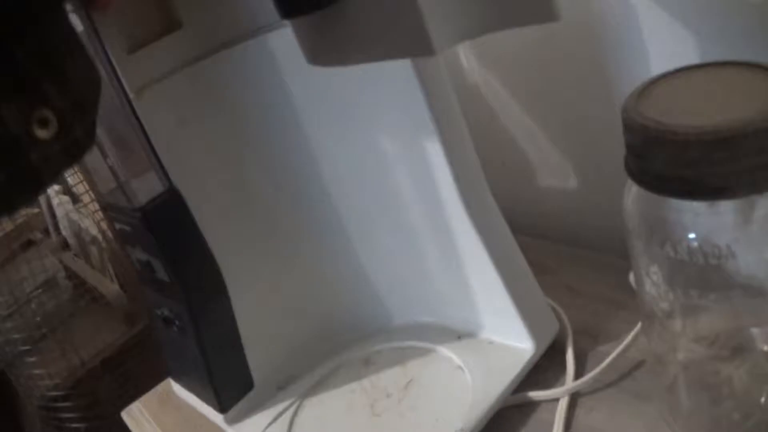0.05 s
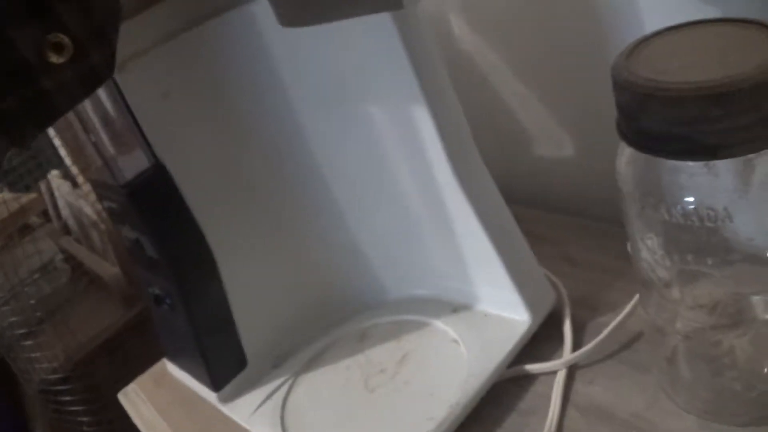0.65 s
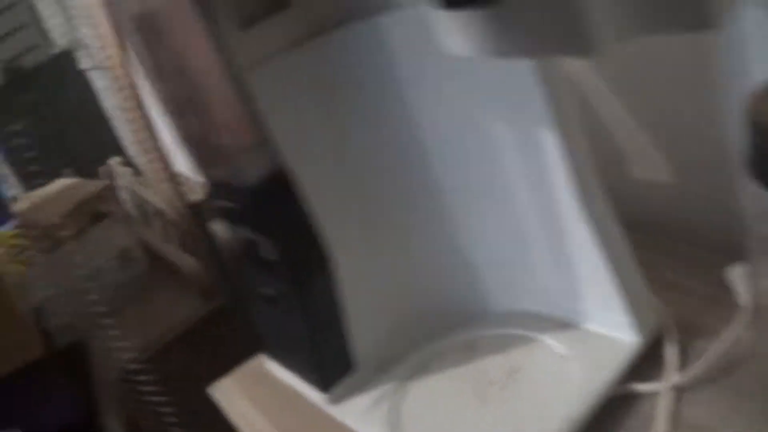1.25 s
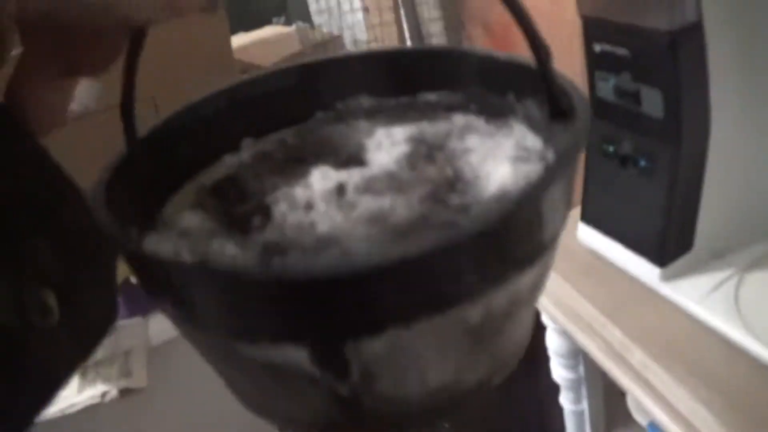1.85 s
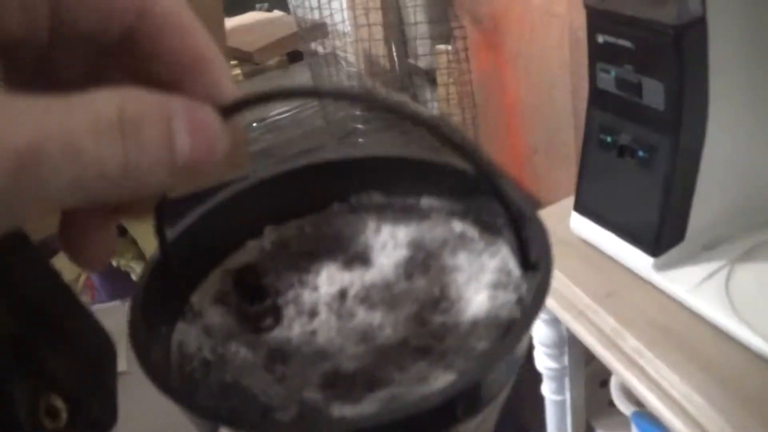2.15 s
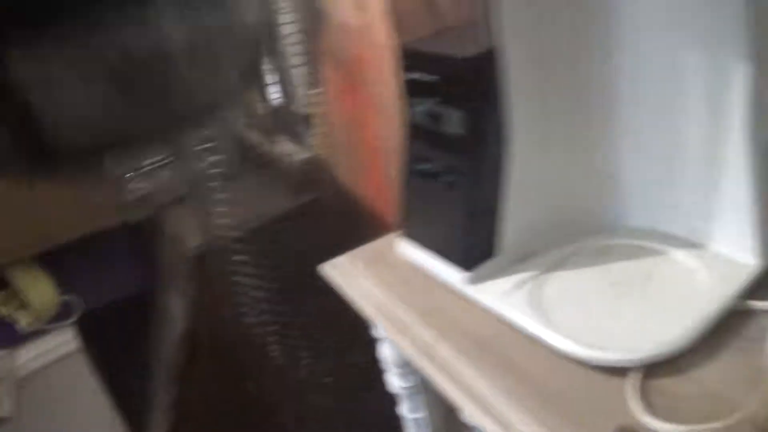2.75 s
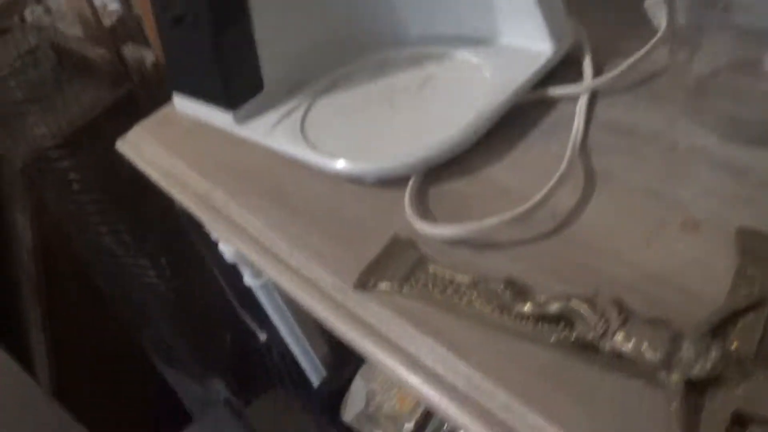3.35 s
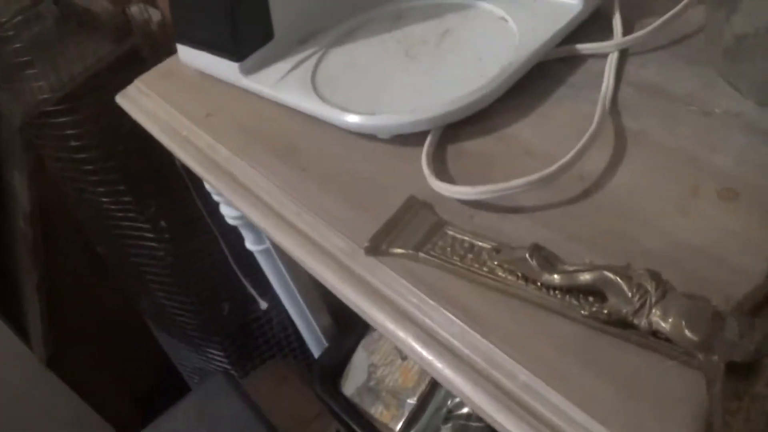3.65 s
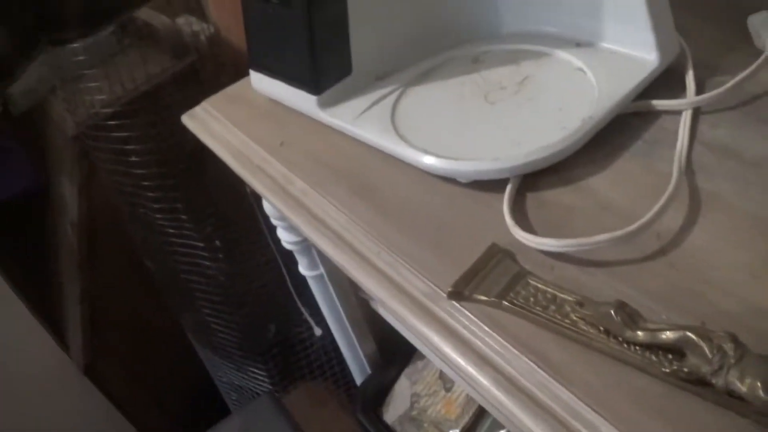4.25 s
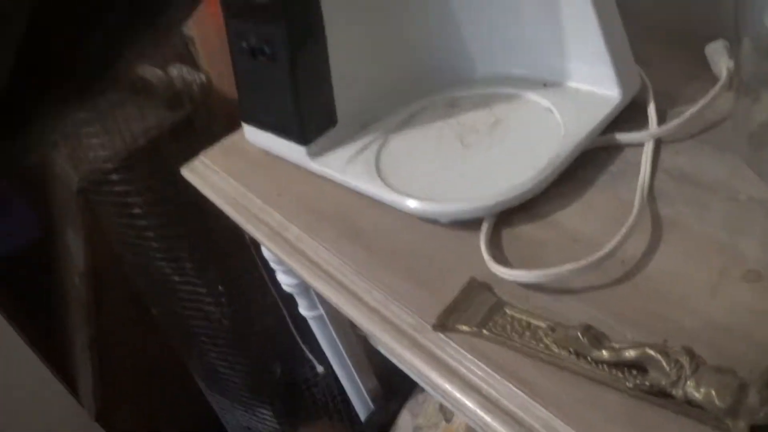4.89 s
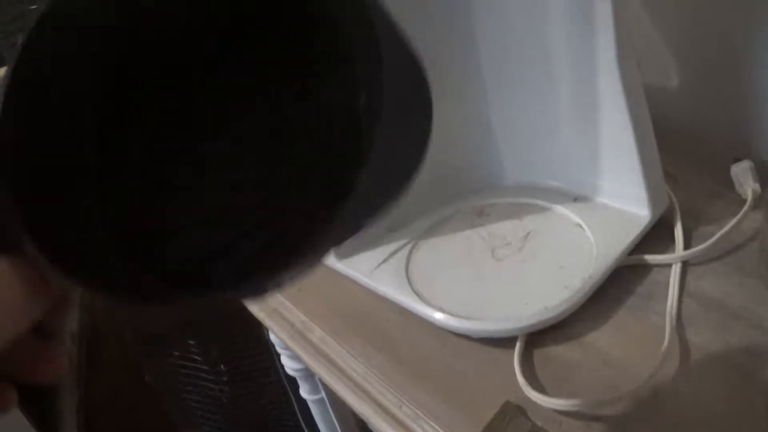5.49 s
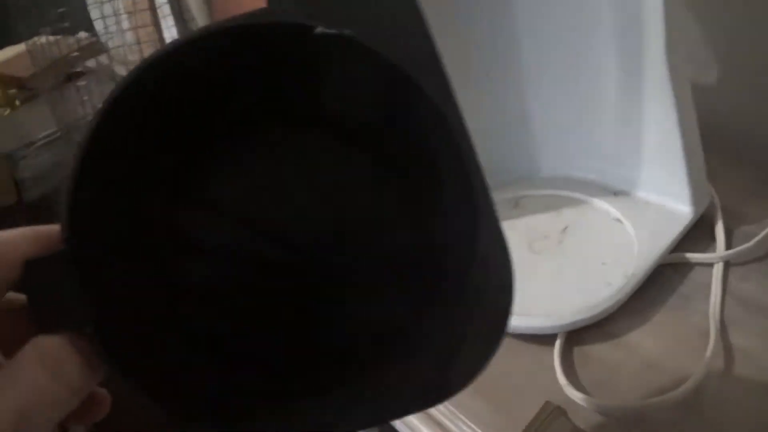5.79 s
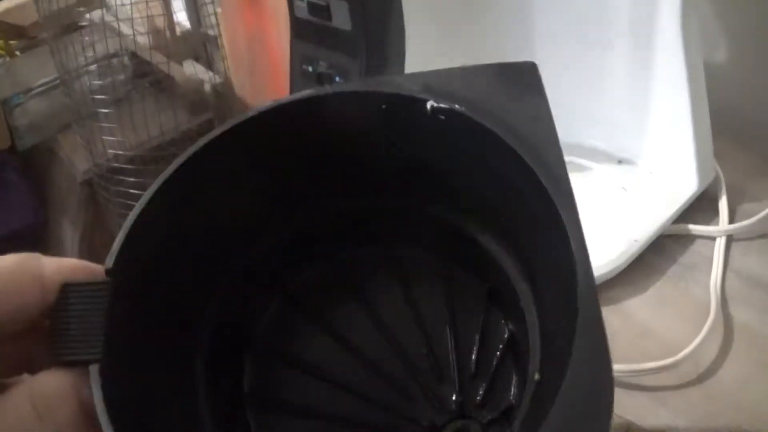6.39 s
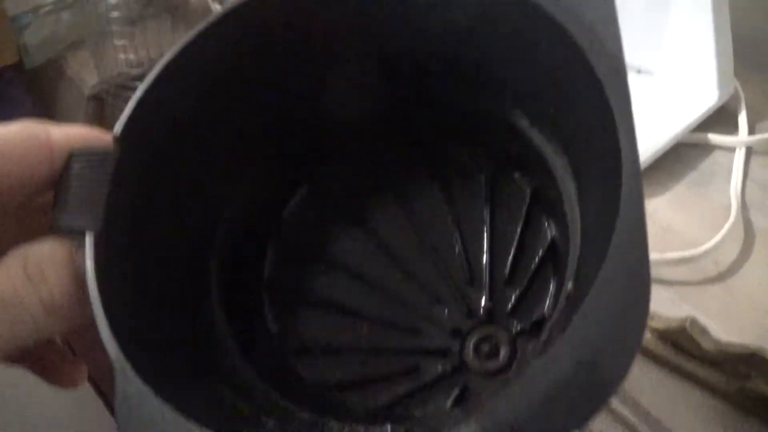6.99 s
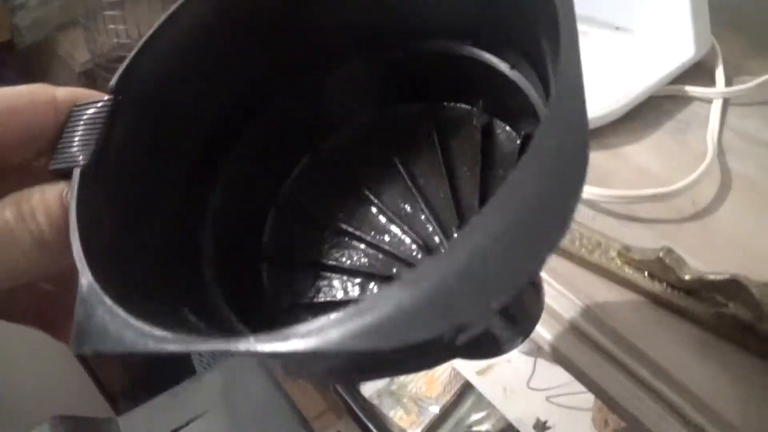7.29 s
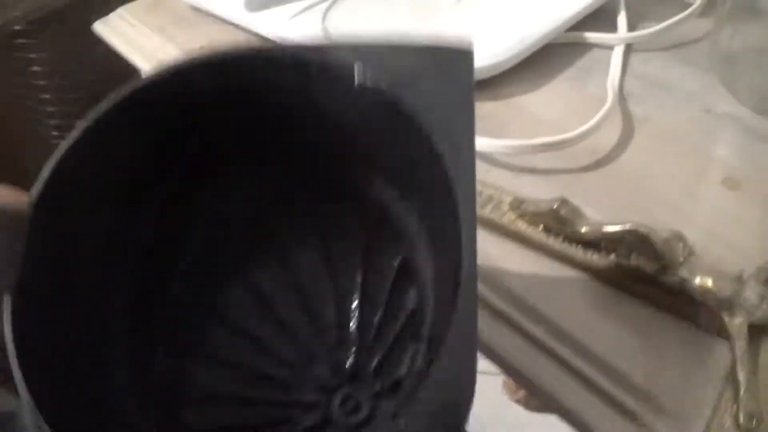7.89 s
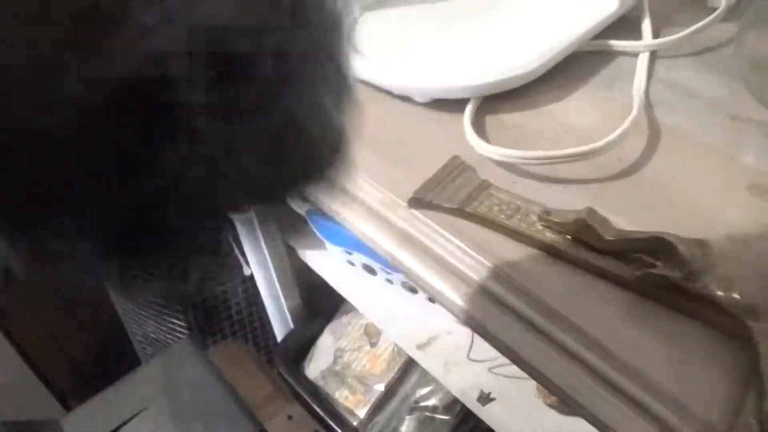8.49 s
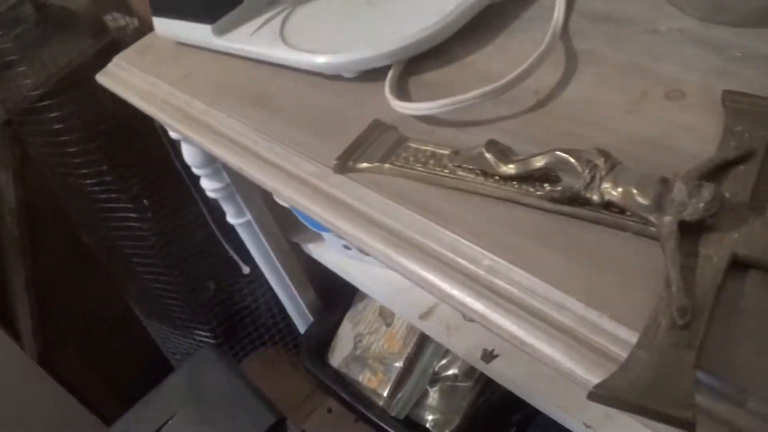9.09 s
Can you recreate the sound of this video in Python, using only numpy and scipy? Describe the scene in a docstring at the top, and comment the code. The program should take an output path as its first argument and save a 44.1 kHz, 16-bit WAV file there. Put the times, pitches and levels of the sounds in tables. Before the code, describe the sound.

Close up in a small quiet room with soft air noise and a faint hum, a coffee maker is taken apart by hand. A filter clicks and rubs on its way out, then bounces and rattles briefly on a table. A plastic basket knocks and chatters against the housing as it comes loose. Several seconds of very light handling pass before it is set down with a sharp double knock.

```python
"""Plastic parts of a drip coffee maker, taken apart on a wooden side table in a small quiet room.
The mesh filter is lifted out and dropped, then the basket is tugged free and set down.
Each knock is a clack, a panel tone and the ring of the part; rims rub, parts chatter, fingers tick.
Underneath: room air, mains hum, a sleeve, the hollow of parts held near, a faint lens motor."""
import sys
import numpy as np
from scipy import signal
from scipy.fft import rfft, irfft, next_fast_len
from scipy.io import wavfile

SR = 44100
rng = np.random.default_rng(int(sys.argv[2]) if len(sys.argv) > 2 else 0)


def generate_wav(sig):
    """Save sig (samples, or channels by samples) to the path in sys.argv[1] as 16-bit PCM at SR."""
    pcm = np.round(np.clip(np.atleast_2d(sig).T, -1, 1) * 32767).astype(np.int16)
    wavfile.write(sys.argv[1], SR, pcm)


N = 407484
TIME = np.arange(N) / SR


def from_db(db):
    return 10 ** (np.asarray(db) / 20)


def rms_one(x):
    return x / np.sqrt(np.mean(x ** 2, axis=-1, keepdims=True) + 1e-20)


def at_hz(rows, hz):
    """Table columns interpolated over log frequency."""
    knots_hz, *columns = np.transpose(rows)
    return [np.interp(np.log(np.maximum(hz, 1)), np.log(knots_hz), c) for c in columns]


def add(track, start_s, sound):
    at = max(int(start_s * SR), 0)
    track[at:at + len(sound)] += sound[:N - at]


def fade(t, t60_s):
    return np.exp(-np.log(1000) * t / np.maximum(t60_s, 1e-3))


def swell(t, hz, rise_s):
    """Onset: contact time plus half a cycle, so low modes start slower."""
    return 1 - np.exp(-(t / (rise_s + 0.5 / hz)) ** 2)


def struck_mode(t, hz, t60_s, rise_s):
    return np.sin(2 * np.pi * hz * t) * fade(t, t60_s) * swell(t, hz, rise_s)


def stroke(peak_s, db, rise_s, fall_s):
    """Two-sided Gaussian envelope of one hand movement."""
    away = (TIME - peak_s) / np.where(TIME < peak_s, rise_s, fall_s)
    return from_db(db) * np.exp(-np.minimum(away ** 2, 50))


def wander(per_s, count):
    """Independent random controls, per_s new values a second."""
    knots = rng.standard_normal((count, 4096))
    return np.array([np.interp(TIME * per_s, np.arange(len(k)), k) for k in knots])


def half_octaves():
    """Yields centre_hz and band-pass per band."""
    edges_hz = np.geomspace(70, 16500, 17)
    for lo, hi in zip(edges_hz, edges_hz[1:]):
        yield np.sqrt(lo * hi), signal.butter(2, [lo, hi], "band", fs=SR, output="sos")


def coloured(x, colour):
    """Filter by rows of freq_hz, gain_db."""
    size = next_fast_len(N)
    gain_db, = at_hz(colour, np.fft.rfftfreq(size, 1 / SR))
    return irfft(rfft(x, size) * from_db(gain_db), size)[..., :N]


def resonate(x, colour):
    """Chain of peaks and dips."""
    for hz, width_hz, db in colour:
        cosine_term = -2 * np.cos(2 * np.pi * hz / SR)
        half_width, gain = np.pi * width_hz / SR, from_db(db / 2)
        b = [1 + half_width * gain, cosine_term, 1 - half_width * gain]
        a = [1 + half_width / gain, cosine_term, 1 - half_width / gain]
        x = signal.lfilter(b, a, x + 1e-18)
    return x


def narrow_noise(hz, width_hz):
    """Noise in one resonance; rms 1."""
    sos = signal.butter(2, width_hz, fs=SR, output="sos")
    slow = signal.sosfilt(sos, rng.standard_normal((2, N)))
    phase = 2 * np.pi * hz * TIME
    return rms_one(slow[0] * np.cos(phase) + slow[1] * np.sin(phase))


def tiny_impacts(colour, per_s, floor=0.29):
    """Random impulses over a noise floor; rms 1."""
    impulses = rng.standard_normal(N) * (floor + (rng.random(N) < per_s / SR))
    return rms_one(coloured(impulses, colour))


def clacks(starts_s, levels_db, tilts_db, humps_db, lengths, rise_s):
    """Contacts shake dense, damped plastic modes; the treble dies first."""
    # plastic modes: freq_hz, gain_db, t60_s
    plastic = [(90, -24, 0.069), (131, -26, 0.14), (196, -4.5, 0.1), (301, -7.5, 0.19), (450, -8, 0.1),
               (804, -5.5, 0.075), (1130, 1, 0.019), (1700, -8.5, 0.044), (2300, -6, 0.055),
               (3170, -5.5, 0.033), (4660, -4.5, 0.03), (7100, 2.5, 0.027), (10000, -3, 0.027),
               (14100, -49.5, 0.023)]
    t = np.arange(SR // 6) / SR
    bursts, out = 0, np.zeros(N)
    for hz, band in half_octaves():
        gain_db, t60_s = at_hz(plastic, hz)
        shape = fade(t, t60_s * np.maximum(lengths, .2)[:, None]) * swell(t, hz, rise_s)
        burst = rms_one(signal.sosfilt(band, shape * rng.standard_normal(shape.shape) + 1e-18))
        octaves = np.log2(np.clip(hz, 280, 7000) / 1400)  # tilt and hump pivot at 1400 Hz
        band_db = levels_db + tilts_db * octaves - humps_db * octaves ** 2 + gain_db
        band_rms = from_db(band_db) * np.sqrt(np.mean(shape ** 2, axis=1))
        bursts = bursts + burst * band_rms[:, None]
    for start_s, burst in zip(starts_s, bursts):
        add(out, start_s, burst)
    return out


def knocks(contacts, modes, colour, clack_db, rise_s, panel_t60_cycles, spread_db, max_t60_s=.36):
    """Per contact: clack, short tone of the struck panel, longer ring of the whole part."""
    starts_s, levels_db, tilts_db, humps_db, _, _, rings_db = np.transpose(contacts)
    # bright, strong contacts end sooner; freely ringing parts clack longer
    lengths = 0.74 * 2 ** (-0.057 * tilts_db - 0.016 * levels_db + 0.019 * rings_db)
    out = resonate(clacks(starts_s, levels_db + clack_db, tilts_db, humps_db, lengths, rise_s), colour)
    t = np.arange(SR // 2) / SR
    hz, mode_db, t60_s = np.transpose(modes)
    rings = struck_mode(t, hz[:, None], np.minimum(t60_s, max_t60_s)[:, None], rise_s)
    for start_s, level_db, _, _, panel_hz, panel_db, ring_db in contacts:
        strengths = from_db(mode_db + spread_db * rng.standard_normal(len(hz)))
        strengths *= rng.choice([-1, 1], len(hz))
        panel = from_db(panel_db) * struck_mode(t, panel_hz, panel_t60_cycles / panel_hz, rise_s)
        ringing = from_db(ring_db) * (strengths @ rings)
        add(out, start_s, from_db(level_db) * (panel + ringing))
    return out


def air_and_hum(air_db=-53 + 0.54):
    """Steady air, alike at both ports in the bass and less so in the hiss, plus mains hum."""
    # air spectrum: freq_hz, density_db
    air_colour = [(15, -17), (25, -10.5), (64, -8.5), (87, -11.5), (114, -7), (165, -12.5), (240, -9.5),
                  (309, -11), (405, -11), (540, -8), (690, -6), (1250, -14.5), (1800, -23.5), (3160, -29.5),
                  (4490, -31.5), (9840, -34.5), (16000, -39)]
    # unshared part: freq_hz, gain_db
    side_colour = [(30, -47), (160, -22), (400, -21), (900, -12.5), (2200, -1.5), (5000, -5), (10000, -11),
                   (16000, -59)]
    # mains lines: freq_hz, rms_db
    hum_lines = [(59.8, -70), (119.8, -59.5)]
    mid, side = rms_one(coloured(rng.standard_normal((2, N)), air_colour))
    hum = sum(np.sqrt(2) * from_db(db) * np.sin(2 * np.pi * (hz * TIME + rng.random()))
              for hz, db in hum_lines)
    return from_db(air_db) * (mid + coloured(side, side_colour) * [[1], [-1]]) + hum


def running(runs, t, ramp_s=.06):
    """Motor level: ramp up, hold, ramp down."""
    return sum(from_db(db) * np.clip(.5 + np.minimum(t - start_s, end_s - t) / ramp_s, 0, 1)
               for start_s, end_s, db in runs)


def lens_motor(steps_per_s=29.8, idle_db=-63, spread_db=3.0):
    """Even steps ping one resonance, harder during focus hunts; the drive whirs faintly."""
    # focus hunts: start_s, end_s, level_db
    hunts = [(0, 1.2, -56), (2.1, 2.9, -56), (2.9, 3.5, -53), (4.9, 5.3, -55), (7.7, 8.3, -55.5),
             (8.55, 9.24, -52.5)]
    # drive runs: start_s, end_s, level_db
    whirs = [(1.3, 2.3, -81), (3.95, 4.2, -76), (5, 5.85, -77), (7.4, 7.7, -77)]
    out = np.zeros(N)
    ping = struck_mode(np.arange(SR // 30) / SR, hz=3270, t60_s=.016, rise_s=0.0002)
    for start_s in np.arange(0, TIME[-1], 1 / steps_per_s):
        level = max(running(hunts, start_s), from_db(idle_db))
        add(out, start_s, ping * level * from_db(spread_db * rng.standard_normal()))
    return out + running(whirs, TIME) * narrow_noise(hz=4050, width_hz=99)


def filter_lift():
    """The mesh filter knocks on its way out."""
    # knocks: start_s, level_db, tilt_db_per_oct, hump_db_per_oct2, panel_hz, panel_rel_db, ring_rel_db
    contacts = [(0.068, -34, -4.5, 1.5, 380, -3, -25), (0.091, -28.5, -1, 14, 785, -5, -9.5),
                (0.112, -38, -3, 7, 326, 4, -4), (0.276, -18.5, 4.5, 2.05, 1224, -2, -32),
                (0.3695, -29.5, 4.5, 5, 893, -2, -23), (0.4765, -27.5, 4.5, 6.5, 1190, -22, -40),
                (0.804, -34, -3, 9, 1640, 6, -28), (0.821, -36.0, 3.5, 2, 1700, 9, -32),
                (0.854, -27.5, -4.5, 1.5, 477, 5, -5.5), (0.878, -47, 0, 0.5, 325, 17, -12),
                (0.8915, -18, 2.5, 2.8, 1010, 1, -29), (0.895, -17.5, -2, 1.5, 723, 6, -35),
                (0.941, -24, 0.7, 0.63, 1196, 10.5, -23)]
    # filter modes while lifted: freq_hz, gain_db, t60_s
    filter_modes = [(216, 2, 0.088), (238, -10, .2), (335, -4.5, 0.19), (387, -1.5, 0.14), (511, -8, 0.16),
                    (730, -12, .17), (948, -7, .15), (1270, -20, .13), (1710, -3, 0.081),
                    (2550, -17, 0.087)]
    # clack resonances and dips: centre_hz, width_hz, gain_db
    clack_colour = [(150, 100, -5.5), (372, 100, 3), (1210, 83, 5.5), (1666, 110, 7.5), (2170, 400, -9.5),
                    (2660, 300, -0.5), (3210, 220, 2.5), (4270, 880, -4.5), (6260, 620, 3.5),
                    (10000, 1200, 3), (13900, 4800, -7)]
    return knocks(contacts, filter_modes, clack_colour,
                  clack_db=-0.5, rise_s=0.00072, panel_t60_cycles=24, spread_db=-1.5)


def rim_slides(fall_ratio=0.69):
    """Plastic rims rub in tiny slips; each slide builds, then catches."""
    # slides: peak_s, level_db, rise_s
    slides = [(.1, -52.5, 0.043), (.185, -59.5, 0.033), (0.584, -50.5, 0.014), (0.618, -48, 0.0082),
              (.84, -61.5, 0.13), (4.33, -59.5, 0.12), (4.6, -49.5, 0.063), (4.662, -37, 0.016),
              (4.785, -52.5, 0.044)]
    # friction spectrum: freq_hz, density_db
    slip_colour = [(300, -17), (900, 16.5), (1700, 7), (2400, 6), (3300, 7.5), (4800, 4), (7000, 6),
                   (10000, 5), (12500, -11), (16000, -14)]
    level = sum(stroke(peak_s, db, rise_s, rise_s * fall_ratio) for peak_s, db, rise_s in slides)
    return level * tiny_impacts(slip_colour, per_s=2500)


def finger_ticks():
    """Plastic ticks under the fingers, too light to ring a part."""
    # ticks: start_s, level_db, tilt_db_per_oct
    touches = [(0.5184, -53.5, 6), (0.7792, -46, 4), (1.3884, -56, 7), (1.609, -49.5, 3.5), (2.516, -44, 0),
               (3.318, -43.5, -5.5), (3.8766, -47.5, 4.5), (5.221, -44, 3.3), (5.7153, -45.5, 3),
               (5.7754, -47, 4), (5.8107, -39, -1), (7.221, -47.5, 4.2), (7.923, -36.5, .4),
               (7.9636, -41.5, -4)]
    starts_s, levels_db, tilts_db = np.transpose(touches)
    lengths = np.full(len(touches), 0.63)
    return clacks(starts_s, levels_db, tilts_db, humps_db=4.0, lengths=lengths, rise_s=0.00017)


def sleeve(folds_per_s=45, catch_db=4.0, fall_ratio=1.2):
    """Cloth scratches on cloth and catches on folds; the arm starts briskly, slows gently."""
    # arm movements: peak_s, level_db, rise_s
    arm_moves = [(1.55, -65, 0.17), (3.12, -67.5, 0.31), (4, -67.5, 0.35), (4.55, -70, 0.048),
                 (5.03, -64, 0.43), (7.52, -76, .13), (8.83, -68, 0.23)]
    # cloth spectrum: freq_hz, density_db
    cloth_colour = [(500, -11), (3000, 0.5), (6000, -8), (9000, -1.5), (10800, -6.5), (13000, -19),
                    (16000, -30)]
    level = sum(stroke(peak_s, db, rise_s, rise_s * fall_ratio) for peak_s, db, rise_s in arm_moves)
    folds, = wander(folds_per_s, count=1)
    return level * from_db(catch_db * folds) * tiny_impacts(cloth_colour, per_s=900, floor=0.25)


def hollow(sharpness=5.6):
    """Room noise rings in a part's cavity, louder as it nears the microphone."""
    # close passes: nearest_s, level_db, approach_s, cavity_hz
    passes = [(2.1, -53, 0.63, 810), (7.05, -54, 0.72, 708), (8.25, -58.5, 0.6, 700)]
    return sum(stroke(nearest_s, db, approach_s, approach_s) * narrow_noise(hz, hz / sharpness)
               for nearest_s, db, approach_s, hz in passes)


def filter_drop():
    """The filter bounces on the table, ringing and chattering."""
    # bounces: start_s, level_db, tilt_db_per_oct, hump_db_per_oct2, panel_hz, panel_rel_db, ring_rel_db
    contacts = [(3.5072, -12.5, 0.2, 2.8, 1850, -17, -18), (3.5135, -27, -3, 0.2, 243, -11, -8),
                (3.5315, -20, -1.7, 2.8, 530, -5, -19), (3.5565, -14.5, -3, 4.3, 640, -6.5, -22),
                (3.614, -31.5, -7, 3.7, 610, -20, -30), (3.629, -39, -3.5, 1.6, 756, 15, -7),
                (3.6955, -53.5, 1.6, 0.5, 253, 12, -12), (3.706, -39.5, -12, 5.8, 710, 8, -23),
                (3.756, -47.5, -3, 2.9, 282, -11, -16), (3.7828, -25.5, 3, 1.9, 767, 1, -41)]
    # filter modes: freq_hz, gain_db, t60_s
    filter_modes = [(90.6, -16.5, .4), (124, -7.5, 0.42), (205.3, -2.5, .4), (250.5, 5.5, 0.21),
                    (287, 4, 0.12), (570, 2, 0.21), (612, 1, 0.28), (770, -0.5, .22), (922, -8, 0.36),
                    (1145, 2, 0.33), (1410, 1.5, 0.16), (1590, -2, 0.25), (1710, -9, 0.19),
                    (1844, -4, 0.24), (1970, -22, 0.17), (2080, -11, 0.34), (3120, -11, 0.15),
                    (3370, -2, 0.077)]
    # clack resonances and dips: centre_hz, width_hz, gain_db
    clack_colour = [(380, 47, 3), (960, 310, -10), (1750, 500, 5.5), (2330, 440, -2), (3330, 460, 3.5),
                    (4700, 3400, -0.5)]
    blows = knocks(contacts, filter_modes, clack_colour,
                   clack_db=2.0, rise_s=0.00033, panel_t60_cycles=43, spread_db=1.0)
    return blows + chatter(contacts, gain_db=-25.5, t60_s=0.29)


def chatter(contacts, gain_db, t60_s):
    """A knocked part buzzes against its support: a dying shower of tiny touches per blow."""
    # buzz spectrum: freq_hz, density_db
    buzz_colour = [(400, -28), (1000, 3), (1450, 0), (2300, -7.5), (3500, -8), (5000, -15.5), (8000, -17.5),
                   (15000, -40)]
    t, envelope = np.arange(SR // 3) / SR, np.zeros(N)
    for start_s, level_db, *_ in contacts:
        add(envelope, start_s, from_db(level_db) * fade(t, t60_s) * swell(t, hz=200, rise_s=0.003))
    return from_db(gain_db) * envelope * tiny_impacts(buzz_colour, per_s=300)


def basket_tug():
    """The basket knocks and chatters against the housing as it comes free."""
    # knocks: start_s, level_db, tilt_db_per_oct, hump_db_per_oct2, panel_hz, panel_rel_db, ring_rel_db
    contacts = [(4.265, -28.5, -1.5, 1.15, 604, 4, -28), (4.302, -28, -7.5, 3.7, 534, 3.5, -50),
                (4.567, -41.5, -12, 1.9, 427, 13, -21), (4.5845, -28.1, 4.5, 0.34, 1120, 18.5, -10),
                (4.595, -15.5, -3.5, 2.3, 1680, 6, -15.5), (4.6025, -14, -1.3, 1.7, 307, -8, -13.5),
                (4.643, -26, -1.5, 1.3, 280, -6, -27), (4.6617, -17, 4, 2.6, 840, 6.5, -36),
                (4.674, -25.5, -3.5, 2.4, 555, 4, -32), (4.768, -16.9, 0.5, 3.8, 372, -6.5, -16),
                (4.794, -21, -3, 2.6, 370, 3, -31), (4.8625, -17, 4.8, 7.7, 327, -7, -11)]
    # housing modes: freq_hz, gain_db, t60_s
    housing_modes = [(244, -5, 0.17), (328, 1, 0.19), (404, -7.5, 0.18), (549, 1, 0.081), (613, -11, 0.13),
                     (1020, -11, 0.13), (1596, -1, 0.085), (1823, 8.5, 0.038), (1750, -30, 0.11),
                     (3410, -5.5, 0.096)]
    # clack and chatter resonances and dips: centre_hz, width_hz, gain_db
    tug_colour = [(154, 73, -6), (685, 710, -4), (1080, 120, 5), (1350, 240, -5.5), (1700, 290, 7),
                  (2460, 1150, -3.5), (3300, 600, 6), (4300, 600, -1.5), (5150, 700, 2), (10100, 2200, 0)]
    blows = knocks(contacts, housing_modes, tug_colour,
                   clack_db=-2.5, rise_s=0.000056, panel_t60_cycles=15.3, spread_db=3.5)
    return blows + resonate(chatter(contacts, gain_db=-20.5, t60_s=0.089), tug_colour)


def basket_set_down():
    """The basket lands on the table with two hard knocks and chatters."""
    # knocks: start_s, level_db, tilt_db_per_oct, hump_db_per_oct2, panel_hz, panel_rel_db, ring_rel_db
    contacts = [(9.1133, -15, -0.5, 2, 1005, 9, -9.5), (9.1538, -15, -1, 1.73, 1200, -0.5, -10.5),
                (9.159, -31, -4.5, 1.7, 940, -8, -12), (9.173, -42.5, -14.5, 3.6, 280, 16, -23)]
    # basket modes: freq_hz, gain_db, t60_s
    basket_modes = [(257, -8, .2), (311.4, -5.5, 0.31), (935, 0, 0.14), (960, -5, 0.18), (1076, 6, 0.056),
                    (1860, -3, 0.057)]
    # clack resonances and dips: centre_hz, width_hz, gain_db
    clack_colour = [(148, 180, -15.5), (275, 90, 8.5), (980, 240, -15), (1620, 140, -12), (2300, 970, -4),
                    (5230, 870, -8.5), (13900, 4300, -20)]
    blows = knocks(contacts, basket_modes, clack_colour,
                   clack_db=3.5, rise_s=0.0002, panel_t60_cycles=39, spread_db=3.0)
    return blows + chatter(contacts, gain_db=-15, t60_s=0.28)


def port_difference(side, corner_hz=650):
    """Only short waves differ between the two ports."""
    sos = signal.butter(1, corner_hz, "high", fs=SR, output="sos")
    return signal.sosfilt(sos, side) * [[1], [-1]]


def near_surfaces(x, side_db=-14.0, t60_s=0.014, moves_per_s=70):
    """Hand, housing and tabletop scatter contacts along shifting short paths."""
    t = np.arange(SR // 100) / SR
    shares = wander(moves_per_s, count=3)
    shares /= np.linalg.norm(shares, axis=0)
    paths = rng.standard_normal((len(shares), len(t))) * fade(t, t60_s)
    paths /= np.linalg.norm(paths, axis=1, keepdims=True)
    scattered = signal.oaconvolve(x * shares, paths, axes=1).sum(axis=0)[:N]
    return from_db(side_db) * port_difference(scattered)


def room(x, build_s=0.006, side_db=-3):
    """Diffuse reflections build within milliseconds and die sooner in the treble."""
    # reverberation: freq_hz, gain_db, t60_s
    room_decay = [(100, -6, 0.86), (300, -14.5, 0.32), (744, -13, 0.26), (2000, -22.5, 0.66),
                  (4500, -19, 0.18), (8000, -20.5, 0.31), (11000, -16.5, .22), (14000, -20, .22)]
    t = np.arange(SR * 3 // 4) / SR
    response = 0
    for hz, band in half_octaves():
        gain_db, t60_s = at_hz(room_decay, hz)
        shape = fade(t, t60_s) * (1 - np.exp(-(t / build_s) ** 2))
        reflections = rng.standard_normal((2, len(t))) * shape / np.linalg.norm(shape)
        response = response + from_db(gain_db) * signal.sosfilt(band, reflections)
    mid, side = signal.fftconvolve(x[None], response, axes=1)[:, :N]
    return mid + from_db(side_db) * port_difference(side)


def scene():
    """Handled parts and their reflections over the quiet background."""
    parts = filter_lift() + rim_slides() + finger_ticks()
    parts += filter_drop() + basket_tug() + basket_set_down()
    background = air_and_hum() + lens_motor() + sleeve() + hollow()
    return parts + near_surfaces(parts) + room(parts) + background


def record(dry):
    """Two close microphone ports, left leading in the midrange; top cut at 16 kHz."""
    # left port's lead: freq_hz, phase_rad
    port_phase = [(30, 0), (160, .22), (400, .42), (900, .56), (2200, .3), (5000, .07), (9000, 0),
                  (16000, 0)]
    # balance: time_s, left_minus_right_db
    port_balance = [(0, .5), (.9, 0.5), (2, 0.3), (3.5, 0.4), (4.7, -1.0), (5.2, 0.5), (9.15, 0.4)]
    size = next_fast_len(N + SR // 10)
    lead_rad, = at_hz(port_phase, np.fft.rfftfreq(size, 1 / SR))
    balance_db = np.interp(TIME, *np.transpose(port_balance))
    sides = np.array([[.5], [-.5]])
    ports = irfft(rfft(dry, size) * np.exp(1j * lead_rad * sides), size)[:, :N]
    top_cut = signal.ellip(10, .2, 80, 16000, fs=SR, output="sos")
    return signal.sosfilt(top_cut, ports * from_db(balance_db * sides))


dry = scene()
out = record(dry)
generate_wav(out)
```